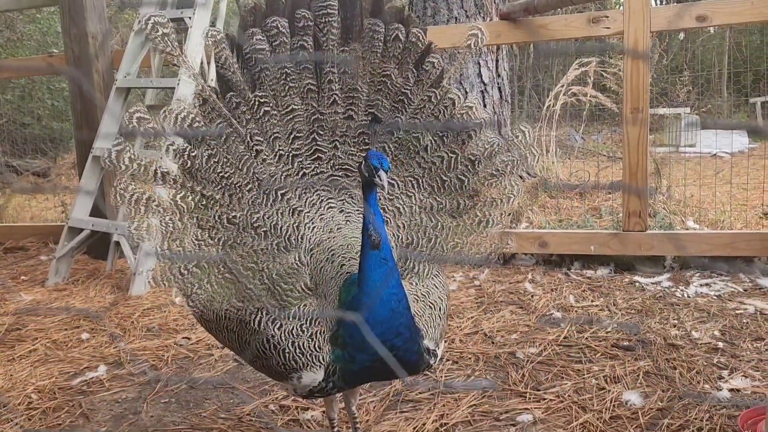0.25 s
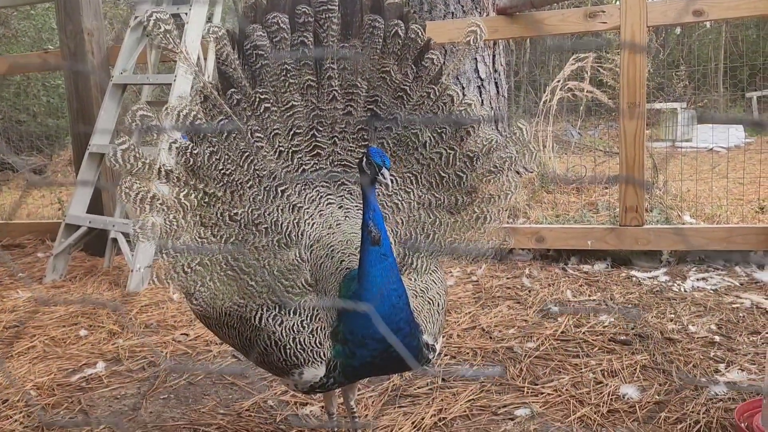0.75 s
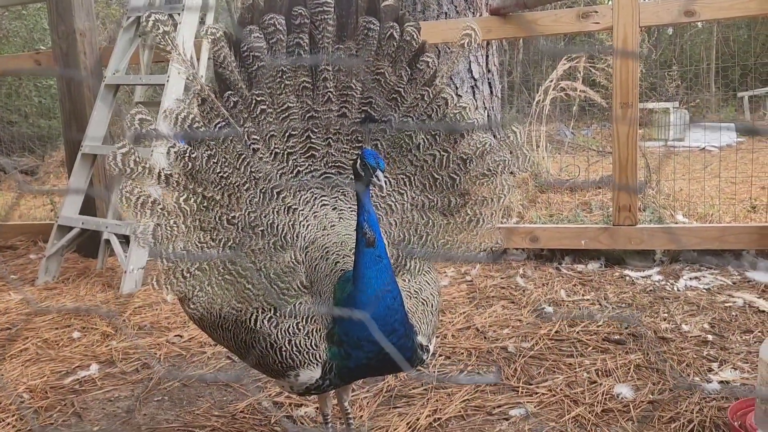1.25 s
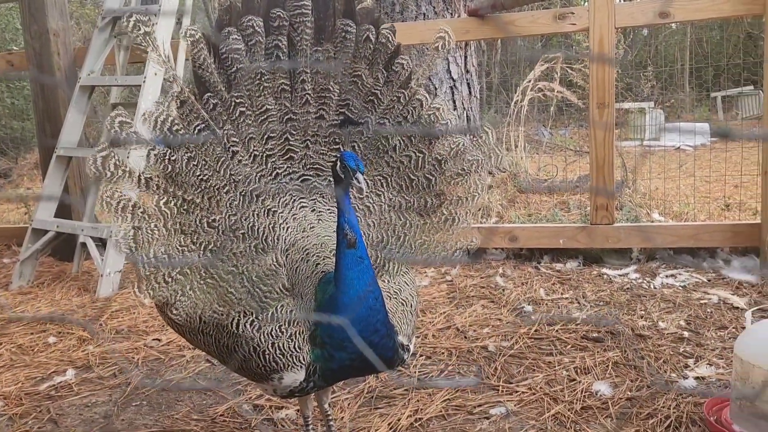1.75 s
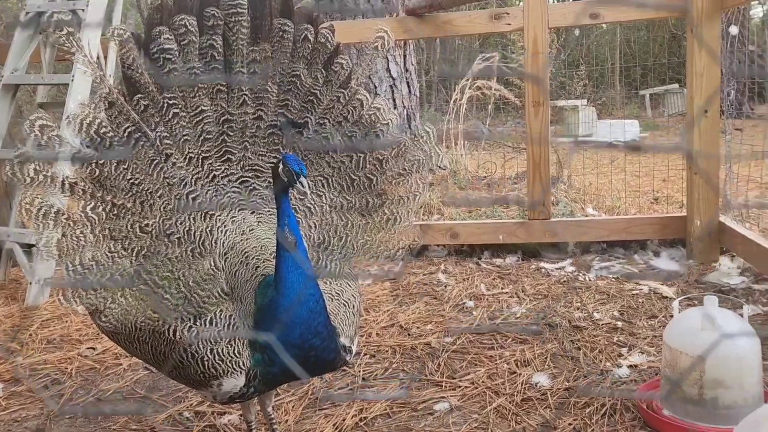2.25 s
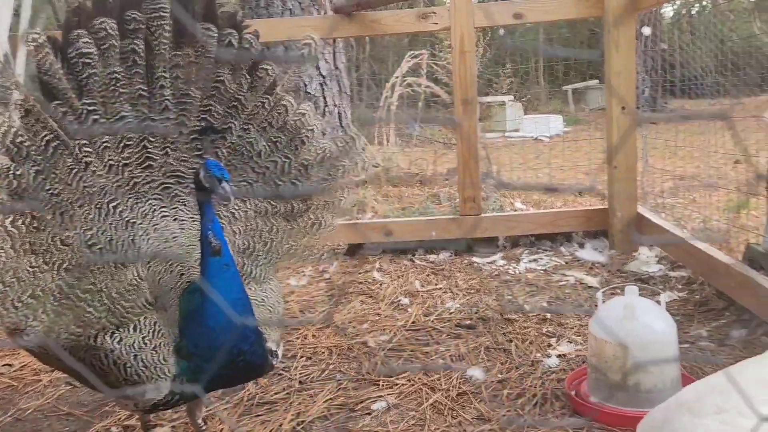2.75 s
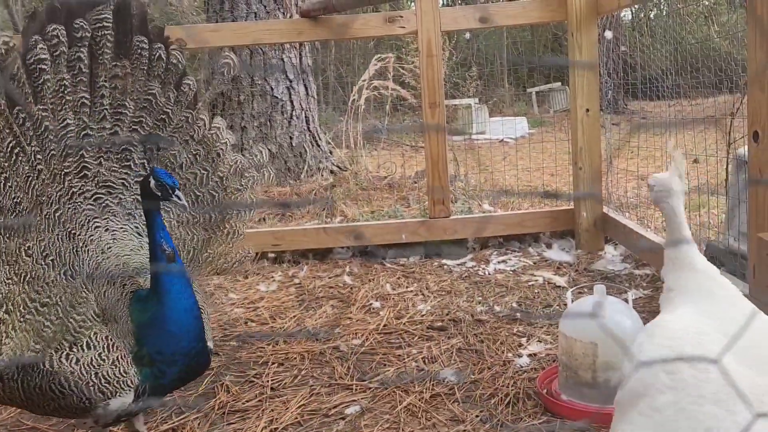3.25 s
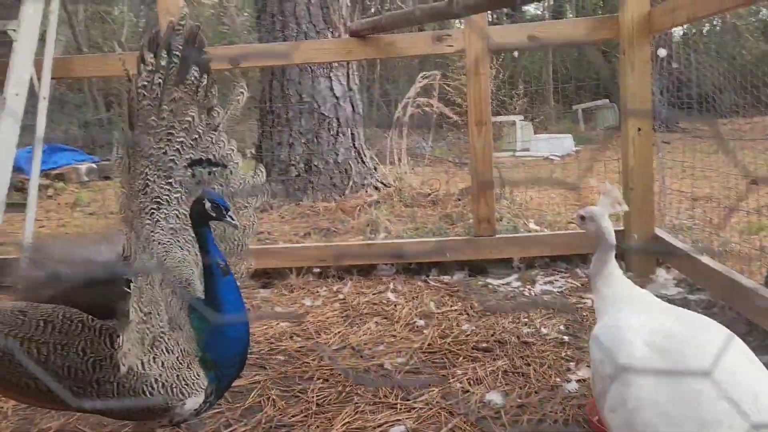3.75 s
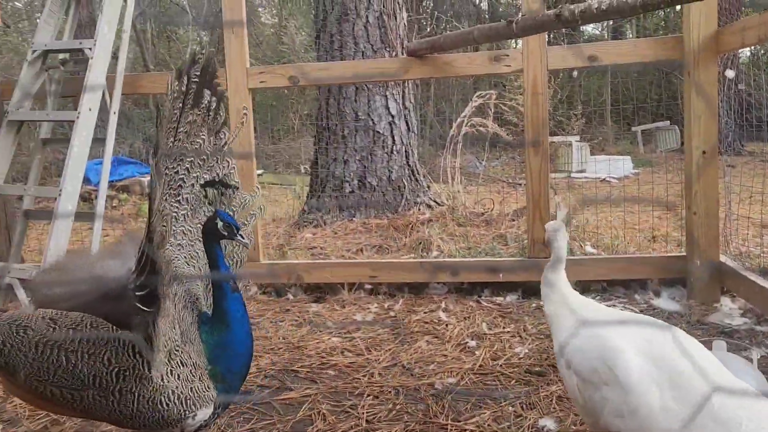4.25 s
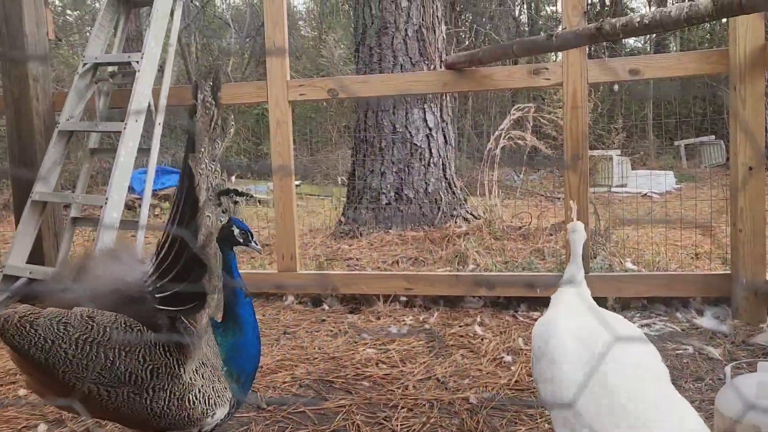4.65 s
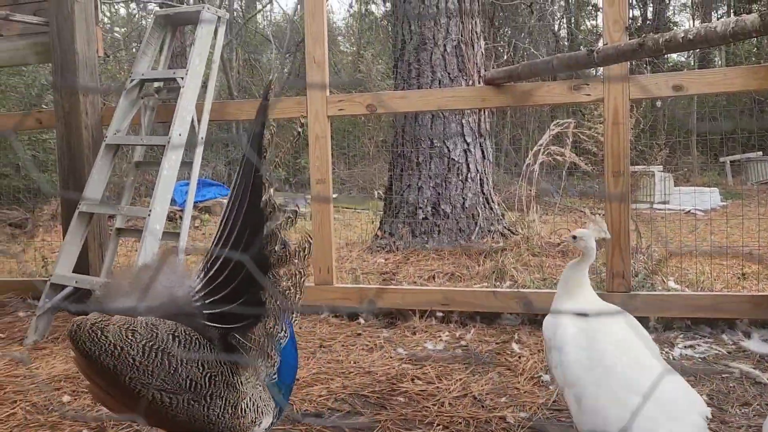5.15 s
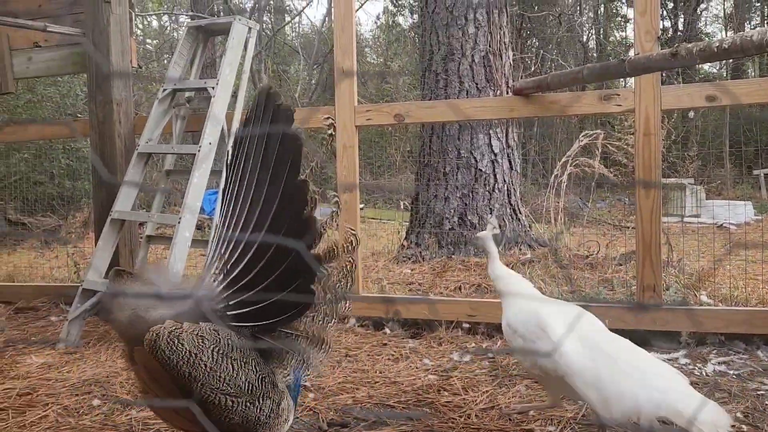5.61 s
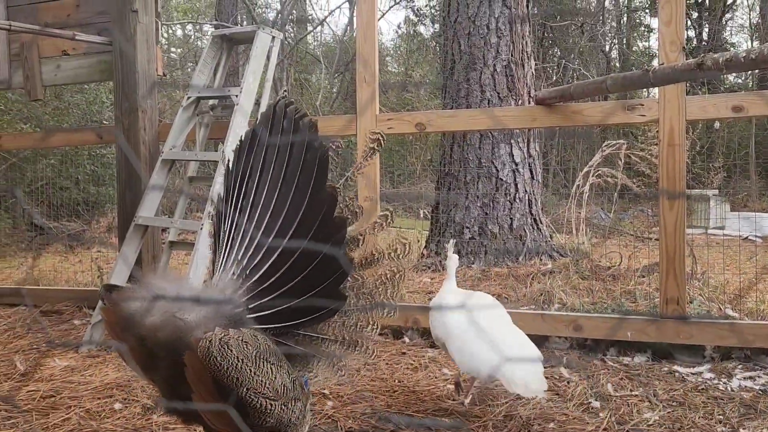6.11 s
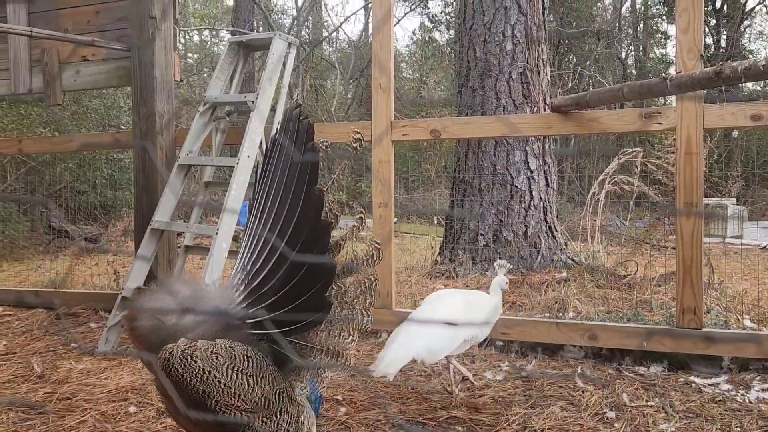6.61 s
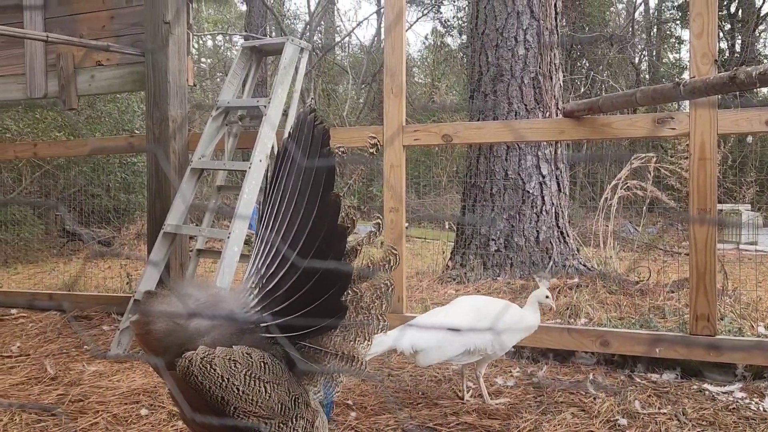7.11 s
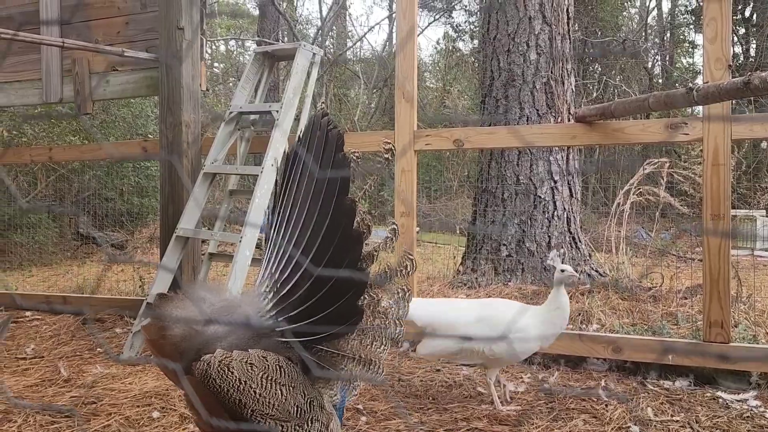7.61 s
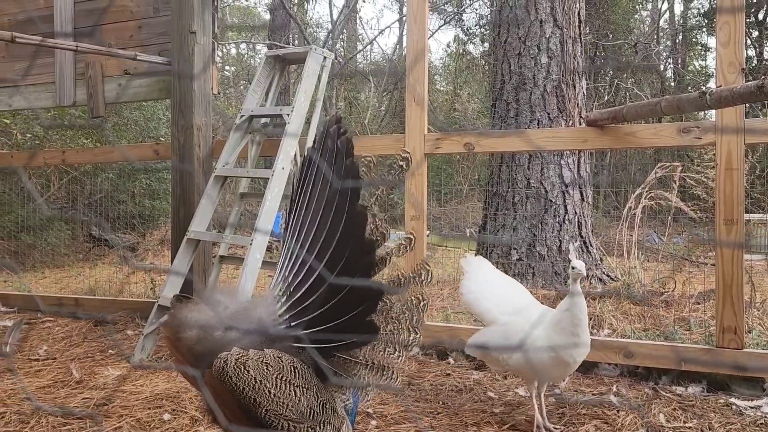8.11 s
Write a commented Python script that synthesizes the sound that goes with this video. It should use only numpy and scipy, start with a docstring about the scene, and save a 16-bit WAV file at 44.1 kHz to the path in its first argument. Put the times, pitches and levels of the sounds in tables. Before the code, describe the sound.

Hens cluck and give one long hoarse call as a peacock rustles his feathers, with chicks peeping and low wind rumble.

```python
"""A wire pen outdoors, the stereo microphone by the fence. A peacock shivers his raised train, feather
brushing feather, while hens close by cluck, whine and give one long hoarse call from pulsing throats.
Chicks peep further in, dry pine straw snaps underfoot and wood knocks dully. Off in the trees a songbird
whistles and a far rooster crows; wind rumbles on the microphone over a distant idling engine."""
import sys
import numpy as np
from scipy import signal
from scipy.fft import rfft, irfft
from scipy.io import wavfile
from scipy.ndimage import uniform_filter1d

SR = 44100
rng = np.random.default_rng(int(sys.argv[2]) if len(sys.argv) > 2 else 0)


def wav_record(signal):
    """Record a signal, one row per channel, as 16-bit PCM in the file named by sys.argv[1]."""
    frames = np.transpose(np.atleast_2d(signal))
    bounded = np.clip(frames, -1, 1)
    # unit amplitude maps onto the largest positive 16-bit level
    quanta = np.round(bounded * 32767).astype(np.int16)
    wavfile.write(sys.argv[1], SR, quanta)


N = 369116
T = np.arange(N) / SR
BIN_HZ = np.maximum(np.arange(N // 2 + 1) * SR / N, 1)


def from_db(db):
    """Decibels to gain."""
    return 10 ** (np.asarray(db) / 20)


def unit_rms(x):
    """Scale to unit power."""
    return x / np.sqrt(np.mean(x ** 2) + 1e-20)


def in_time(points):
    """Read a curve of (seconds, value) points at every sample."""
    return np.interp(T, *np.transpose(points))


def at_hz(points, hz):
    """Read a spectrum on a log-frequency axis."""
    point_hz, values = np.transpose(points)
    return np.interp(np.log(hz), np.log(point_hz), values)


def ramp(start, length):
    """Rise from 0 to 1 over the given seconds."""
    return np.clip((T - start) / length, 0, 1)


def arch(length):
    """A swell that rises and falls over the given seconds."""
    return np.sin(np.linspace(0, np.pi, max(int(length * SR), 64)))


def drift(rate_hz):
    """A smooth random wander with spread 1."""
    hop = 40
    pole = np.exp(-2 * np.pi * rate_hz * hop / SR)
    slow = signal.lfilter([1], [1, -2 * pole, pole ** 2], rng.standard_normal(N // hop + 2002))[2000:]
    return np.interp(np.arange(N) / hop, np.arange(len(slow)), unit_rms(slow))


def band(x, low_hz, high_hz):
    """Gentle band-pass."""
    sos = signal.butter(2, [low_hz, min(high_hz, .45 * SR)], "band", fs=SR, output="sos")
    return signal.sosfilt(sos, x + 1e-18)


def resonate(x, modes):
    """Parallel resonances with alternating signs."""
    out = 0
    for k, (hz, width, db) in enumerate(modes):
        r = np.exp(-np.pi * width / SR)
        feed = np.array([1, 0, -1]) * (1 - r * r) / 2
        feedback = [1, -2 * r * np.cos(2 * np.pi * hz / SR), r * r]
        out = out + (-1) ** k * from_db(db) * signal.lfilter(feed, feedback, x + 1e-18)
    return out


def add(track, start, sound):
    """Mix a sound in at its start time in seconds."""
    at = round(start * SR)
    part = sound[max(-at, 0):max(N - at, 0)]
    track[max(at, 0):max(at, 0) + len(part)] += part


def notes(rows, throat, bow_oct, jitter, jitter_hz, flutter, harmonics):
    """Bird calls: harmonic tones on bowed glides; the membrane wavers in pitch and strength."""
    out, waver, shake = np.zeros(N), drift(jitter_hz), drift(jitter_hz)
    k = np.arange(1, harmonics + 1)[:, None]
    for start, length, middle_hz, fall_oct, db, tilt_db in rows:
        swell = arch(length)
        along = np.linspace(-1, 1, len(swell))
        here = (np.arange(len(swell)) + int(abs(start) * SR)) % N
        hz = middle_hz * 2 ** (-fall_oct * along / 2 - bow_oct * along ** 2) * (1 + jitter * waver[here])
        gains = from_db(at_hz(throat, k * hz) + tilt_db * np.log2(k)) * (k * hz < SR / 2)
        tone = np.sum(gains * np.sin(2 * np.pi * k * np.cumsum(hz) / SR), axis=0)
        add(out, start, from_db(db) * unit_rms(tone) * swell * (1 + flutter * shake[here]))
    return out


# Diffuse sound at the microphone's two ports. Each row: frequency in Hz, left-right correlation.
PORT_LIKENESS = [(40, 1), (250, 0.82), (600, 0.43), (1200, 0.13), (2500, 0), (15000, 0)]
def diffuse(pair, spectrum):
    """Two unrelated noises become a stereo field with this spectrum, alike in the bass."""
    skirt = np.minimum(BIN_HZ / spectrum[0][0], 1) ** 2
    mid, side = rfft(pair) * from_db(at_hz(spectrum, BIN_HZ)) * skirt
    alike = at_hz(PORT_LIKENESS, BIN_HZ)
    return unit_rms(irfft(np.sqrt(1 + alike) * mid + np.sqrt(1 - alike) * side * [[1], [-1]], N))


# The hush all round the pen. Each row: frequency in Hz, relative density in dB.
AIR_SPECTRUM = [(200, -8), (400, -6.5), (600, -10), (1150, -14), (2120, -19), (2600, -25.5), (4500, -23),
                (6600, -31.5), (7700, -19.5), (10200, -42.5), (13000, -37), (15800, -49)]
def still_air(level_db=-67):
    """Still air in the woods, a faint even hiss."""
    return from_db(level_db) * diffuse(rng.standard_normal((2, N)), AIR_SPECTRUM)


# Rumble right on the microphone. Each row: frequency in Hz, relative density in dB.
WIND_SPECTRUM = [(15, -13), (28, 2.5), (45, 4.5), (70, 4), (110, 0), (160, -6.5), (230, -18.5),
                 (400, -58.5)]
# The wind's strength, dropping late on. Each row: time in seconds, level in dB.
GUSTS = [(0, -52), (5.6, -50), (6.2, -56), (8.37, -54)]
def wind():
    """Wind buffets the ports in an unsteady rumble."""
    return from_db(in_time(GUSTS) + drift(5.7)) * diffuse(rng.standard_normal((2, N)), WIND_SPECTRUM)


def engine(turn_hz=22.37, peak_s=7.64, peak_db=-44.5, idle_db=-62.5):
    """Two low orders of a far engine hum, swelling once out of a faint idle."""
    below_peak_db = np.maximum(6.5 * (peak_s - T), 17 * (T - peak_s))   # rise and fall in dB per second
    turns = np.cumsum(turn_hz * (1 + .013 * drift(2.3))) / SR
    hum = sum(from_db(db + drift(2.4)) * np.sin(2 * np.pi * order * turns)
              for order, db in [(2, -.5), (3, -4.5)])
    return from_db(np.maximum(peak_db - below_peak_db, idle_db)) * unit_rms(hum)


# Hens clucking near the fence. Each row: start in seconds, pitch in Hz, level in dB,
# beak opening in dB, resonance of the throat's hollow in Hz.
CLUCKS = [(-.012, 380, -50, 0, 400), (.084, 384.4, -50.5, 5, 517), (.147, 273, -46.5, 1.5, 340),
          (.338, 315.5, -39.5, 2, 330), (.476, 321, -43, 0, 330), (.618, 299.6, -48.5, 1, 320),
          (.82, 230, -49.5, -20, 340), (.906, 239.7, -38.5, -17, 360), (1.011, 235.5, -41, -17, 390),
          (1.139, 250, -42, -12, 480), (1.255, 184.7, -44.5, -15, 385), (1.377, 205.5, -47.5, -19, 333),
          (1.508, 190.5, -46.5, -2, 385), (1.638, 231, -46, -1, 402), (1.77, 265, -47, -3, 279.8),
          (1.897, 261, -47, 2, 292), (2.216, 256.3, -46, -0.5, 422), (2.35, 208.3, -50, -3, 375),
          (2.502, 250, -49, -3, 330), (2.933, 277, -42, 1, 285), (3.256, 298, -51.5, -1, 350),
          (3.316, 261, -51.5, 4, 350)]
# Resonances of the throat, then of the beak. Each row: centre in Hz, width in Hz, gain in dB.
CLUCK_THROAT = [(210, 70, 0), (502, 120, -8), (695, 50, -5.5)]
CLUCK_BEAK = [(795, 79, -2), (1293, 120, -9.5), (1610, 154, -10.5), (2250, 140, -17.5), (4030, 800, -12.5)]
def clucks(length_s=.06, jitter=.1, weakening=.35, breath=.09, sink=.12, lift=.19):
    """Strong and weak pulses alternate and ring the throat; an open beak adds the upper resonances."""
    out, waver, n = np.zeros(N), drift(50), int(length_s * SR)
    swell = np.abs(np.sin(np.pi * np.linspace(0, 1, n) ** .75)) ** 1.7   # opens faster than it closes
    along = np.linspace(-1, 1, n)
    tightening = np.cumsum(np.exp(lift * along))   # the throat tightens, so its resonances rise
    for start, hz, db, open_db, hollow_hz in CLUCKS:
        cycles = np.cumsum(hz * np.exp(jitter * waver[int(abs(start) * SR):][:n] - sink * along)) / SR
        pulses = np.diff(np.floor(cycles), prepend=0) * (1 - weakening * (np.floor(cycles) % 2))
        source = pulses + breath * rng.standard_normal(n) * (1 - cycles % 1) ** 2
        throat = band(resonate(source, CLUCK_THROAT + [(hollow_hz, 95, 5)]), 130, 624)
        beak = band(resonate(source, CLUCK_BEAK), 770, 2460)
        voice = np.interp(tightening, np.arange(n), throat + from_db(open_db) * beak)
        add(out, start, from_db(db) * swell * unit_rms(voice))
    return out


# The same hens whining. Each row: start and length in seconds, pitch in Hz, fall in octaves, level in dB.
WHINES = [(0.03, 0.29, 535, 0.06, -58), (.37, .13, 550, -.06, -58), (0.12, 0.33, 397.3, 0.024, -57),
          (0.43, 0.34, 392, 0.14, -54), (.72, .25, 355, .1, -60), (0.499, 0.14, 598.5, -0.16, -54.5),
          (0.56, 0.095, 662, 0.31, -50.5), (1.585, 0.059, 368, 0.18, -50), (1.674, .05, 378, .3, -48),
          (1.718, 0.16, 420, -0.084, -56), (1.851, 0.031, 432, 0.021, -54),
          (1.92, 0.25, 417.5, 0.14, -51.5), (4.46, .4, 425, .25, -49.5), (4.76, .19, 391.6, 0.16, -53)]
# A hen's throat in whines and alarm clucks. Each row: frequency in Hz, gain in dB.
HEN_THROAT = [(350, 18.5), (560, -2.5), (830, 12.5), (1050, -9), (1350, -3), (1750, -14.5), (2200, -21),
              (2700, -47), (3600, -34), (5500, -42.5), (8000, -51)]
def whines(tilt_db=.7):
    """Soft tones, short or drawn out, coloured by the throat; the level is rough and wavering."""
    rows = [(*row, tilt_db) for row in WHINES]
    voice = notes(rows, HEN_THROAT, bow_oct=.0394, jitter=.028, jitter_hz=30, flutter=.37, harmonics=7)
    return voice * (1 + .24 * drift(110)) * from_db(1.6 * drift(12))


# A hen further left. Each row: start and length in seconds, pitch in Hz, level in dB,
# brightness in dB per octave.
CRIES = [(0.186, 0.042, 602, -53.5, -11), (1.51, 0.047, 584, -48.5, -11), (3.059, 0.062, 573, -56, 7),
         (3.187, 0.047, 694, -45, 10), (3.402, 0.033, 480, -46, -2), (3.495, 0.073, 523, -43.5, -9),
         (3.64, 0.122, 478, -44, -7), (4.415, .09, 545, -43, -11), (3.692, .035, 695, -35, 13.5),
         (3.877, .04, 640, -34.5, 15)]
# Her throat. Each row: frequency in Hz, gain in dB.
CRY_THROAT = [(550, -18), (1000, 5), (1400, 1.5), (1950, -3), (2700, -17.5), (4000, -32)]
def cries(rise_oct=.09):
    """Slightly rising cries, made nasal by a throat that favours the overtones."""
    rows = [(start, length, hz, -rise_oct, db, tilt_db) for start, length, hz, db, tilt_db in CRIES]
    return notes(rows, CRY_THROAT, bow_oct=.05, jitter=.015, jitter_hz=120, flutter=.25, harmonics=6)


# Chicks further into the pen. Each row: start and length in seconds, middle pitch in Hz,
# fall in octaves, level in dB.
PEEPS = [(3.135, .045, 3700, -.4, -56), (3.171, 0.056, 3860, 0.55, -49), (4.565, 0.055, 3320, 0.44, -50.5),
         (5.506, .06, 3370, 0.36, -48.5), (5.667, 0.069, 3396, 0.48, -47), (6.82, .026, 3150, -0.7, -59),
         (6.837, .032, 4150, .1, -52.5), (6.858, .035, 3200, .45, -58), (6.898, 0.083, 3280, 0.7, -53.5),
         (7.027, .088, 3570, .5, -49), (7.19, 0.094, 3540, 0.55, -48), (7.478, 0.1, 3450, .5, -55),
         (7.658, .1, 3430, 0.58, -53)]
# A squealing throat, then a flat one for pure whistles. Each row: frequency in Hz, gain in dB.
SQUEAL_THROAT = [(2500, -21), (4400, 2.5), (5400, -3.5), (7400, -24), (10000, -18), (12500, -38),
                 (15000, -46)]
FLAT_THROAT = [(2000, 0), (12000, 0)]
def chicks(octave_db=-19.5, squeal_at_s=.521):
    """One shrill squeal breaks down from its loud second harmonic; nearly pure peeps follow."""
    squeal_row = (squeal_at_s, .112, 2484, .131, -46, 0)
    break_row = (.598, .038, 3800, .131, -51)
    rows = [(*row, octave_db) for row in PEEPS + [break_row]]
    peeps = notes(rows, FLAT_THROAT, bow_oct=.07, jitter=.036, jitter_hz=520, flutter=.46, harmonics=2)
    squeal = notes([squeal_row], SQUEAL_THROAT,
                   bow_oct=.031, jitter=.042, jitter_hz=600, flutter=.36, harmonics=6)
    return peeps + ramp(squeal_at_s, .016) * squeal


def crackle(rows, attack_s=.0004, decay_s=.003, band_ratio=1.98):
    """Each touch sets off a burst of tiny cracks that builds quickly and dies away."""
    out, t = np.zeros(N), np.arange(SR // 4) / SR
    burst = (1 - np.exp(-t / attack_s)) * np.exp(-t / decay_s)
    for start, db, hz in rows:
        cracks = band(rng.laplace(size=len(t)), hz / band_ratio, hz * band_ratio)
        add(out, start, from_db(db) * burst * unit_rms(cracks))
    return out


# Snaps, then scratches, on the pen floor. Each row: start in seconds, level in dB, centre in Hz.
SNAPS = [(.856, -55, 6500), (2.129, -47.5, 9500), (2.161, -50.5, 8500), (2.269, -40, 4200),
         (2.288, -51, 3600), (2.328, -52, 8000), (7.531, -55, 4800), (7.744, -43, 9000)]
SCRATCHES = [(2.286, -59, 2860), (2.318, -52.5, 2200), (2.672, -51, 1980), (2.876, -57.5, 9000),
             (2.928, -53, 3200), (3.328, -42.5, 4500), (6.864, -65, 9000)]
def straw():
    """Dry pine straw snaps underfoot; scratching feet draw longer crackles from it."""
    return crackle(SNAPS, band_ratio=1.9) + crackle(SCRATCHES, attack_s=.008, decay_s=.033)


# The peacock's bouts of shivering. Each row: start, build-up and stop in seconds, relative level in dB.
SHIVERS = [(1.17, 0.24, 1.75, -69.5), (2.48, 0.2, 2.78, -67), (2.72, 1.0, 5.965, -54.5),
           (6.45, 0.2, 6.72, -74), (7.64, 0.5, 8.32, -56)]
# The rustle of his quills. Each row: frequency in Hz, relative density in dB.
QUILL_SPECTRUM = [(290, -46), (500, -10), (697, -5), (1140, -5), (1660, -0.5), (1810, -4.5), (2150, 2),
                  (2450, -4.5), (5420, -3.5), (5920, -6.5), (8860, -7.5), (10900, -14), (12900, -5.5),
                  (15800, -14.5)]
def shivering_train(shake_hz=25.65, grains_per_s=12000, settle_db_per_s=75, rest_db=-89, gain_db=8.5):
    """Feathers brush twice a shake, denser and brighter the harder he shivers; the fan wafts the air."""
    bouts = [from_db(db - settle_db_per_s * np.maximum(T - stop, 0)) * ramp(start, build) ** 1.18
             for start, build, stop, db in SHIVERS]
    level = np.sqrt(from_db(rest_db) ** 2 + np.sum(np.square(bouts), axis=0))
    vigour = level / level.max()
    gentleness = 1 - vigour
    shakes = np.cumsum(shake_hz * (1 + .026 * drift(5.7))) / SR
    strokes = 1 + .09 * np.sin(4 * np.pi * shakes)
    density = np.clip(grains_per_s / SR * vigour ** .33, .01, 1)
    grains = rng.standard_normal((2, N)) * (rng.random((2, N)) < density) / np.sqrt(density)
    patches = from_db(2.5 * gentleness * drift(250))   # gentle shivers break up into separate scratches
    patches /= np.sqrt(uniform_filter1d(patches ** 2, SR // 10))
    rustle = diffuse(grains * patches, QUILL_SPECTRUM)
    sheen = signal.sosfiltfilt(signal.butter(2, 9500, "high", fs=SR, output="sos"), rustle)
    rustle -= .42 * gentleness * sheen
    waft_level = from_db(-67 + 3 * drift(12)) * vigour ** .63
    waft = waft_level * unit_rms(band(rng.standard_normal(N), 140, 340))
    flicker_db = (.66 + gentleness) * drift(20)
    return waft + from_db(gain_db + flicker_db) * level * strokes * rustle


# His train sweeping through the air and over the straw as he turns.
# Each row: start and length in seconds, level in dB, centre in Hz.
SWEEPS = [(1.27, .22, -64, 2060), (2.5, 0.32, -64, 2000), (3.05, .14, -58.5, 4500), (3.25, .1, -55, 7500),
          (3.58, 0.35, -49.3, 4600), (3.6, .42, -57, 270), (5.11, .28, -56, 260),
          (5.141, 0.21, -56.5, 2300), (7.77, .22, -65, 1500)]
def train_sweeps(band_ratio=1.42):
    """Long feathers slide past each other in a grainy swish."""
    out = np.zeros(N)
    for start, length, db, hz in SWEEPS:
        swell = arch(length)
        barbs = unit_rms(band(rng.laplace(size=SR), hz / band_ratio, hz * band_ratio))
        add(out, start, from_db(db) * swell * barbs[:len(swell)])
    return out * from_db(1.6 * drift(30))


# A songbird off in the trees. Each row: start and length in seconds, pitch in Hz, level in dB.
WHISTLES = [(1.574, .07, 3560, -58), (1.64, 0.2, 3230, -68), (6.525, 0.06, 3317, -61),
            (6.596, 0.19, 3120, -64), (7.565, .13, 3580, -66), (7.77, 0.12, 3530, -64)]
def songbird(fall_oct=.1, octave_db=-35):
    """Thin, gently falling whistles that waver in level."""
    rows = [(start, length, hz, fall_oct, db, octave_db) for start, length, hz, db in WHISTLES]
    voice = notes(rows, FLAT_THROAT, bow_oct=.015, jitter=.013, jitter_hz=140, flutter=.4, harmonics=2)
    return voice * from_db(2.5 * drift(18))


# A startled hen close to the microphone. Each row: start and length in seconds, pitch in Hz,
# fall in octaves, level in dB, brightness in dB per octave.
ALARMS = [(2.038, 0.021, 555, -0.11, -26.1, -1.5), (2.047, 0.019, 688, -0.17, -34, 8),
          (2.129, 0.018, 665, -0.28, -34.3, 2.5), (2.145, .017, 589, 0.77, -33, -1.5),
          (2.202, 0.01, 600, -.05, -43, -8)]
def alarm_clucks():
    """Sharp, very short tones whose pitch arches through the throat's resonances."""
    return notes(ALARMS, HEN_THROAT, bow_oct=.14, jitter=.02, jitter_hz=200, flutter=.2, harmonics=12)


# Dull knocks in the pen, likely beaks or feet on wood. Each row: start in seconds, level in dB,
# pitch in Hz.
KNOCKS = [(2.269, -48, 700), (5.604, -41, 630), (6.108, -44, 320), (7.638, -54, 890), (7.803, -49, 950),
          (7.925, -47, 490)]
def knocks(attack_s=.0004, decay_s=.0045, crack_db=-2):
    """A rap sets one low resonance of the wood ringing for a moment, with a dry crack on top."""
    out, t = np.zeros(N), np.arange(SR // 10) / SR
    envelope = (1 - np.exp(-t / attack_s)) * np.exp(-t / decay_s)
    for start, db, hz in KNOCKS:
        add(out, start, from_db(db) * envelope * np.sin(2 * np.pi * hz * t))
    return out + from_db(crack_db) * crackle(KNOCKS)


# Soft steps among the hens. Each row: start in seconds, level in dB.
STEPS = [(2.59, -45), (2.71, -44), (3.615, -48.5), (3.755, -46.5), (3.925, -45.5), (4.09, -50),
         (5.208, -45.5), (5.28, -48)]
def footfalls(length_s=.054):
    """Feet press the litter with a dull thud."""
    out, swell = np.zeros(N), arch(length_s)
    thud = band(rng.standard_normal(N), 100, 315)
    for start, db in STEPS:
        add(out, start, from_db(db) * swell * unit_rms(thud[int(start * SR):][:len(swell)]))
    return out


# Where a near hen's long call catches and rings clear. Each row: start and length in seconds,
# level in dB, throb depth from 0 to 1.
CATCHES = [(3.757, 0.056, -38.5, .2), (3.875, 0.07, -36.3, 0.3), (3.995, 0.045, -43, .3),
           (4.059, 0.041, -35, 0.65), (4.117, 0.042, -34.5, 0.35), (4.146, .06, -39, .6),
           (4.195, 0.052, -29.8, 0.4), (4.266, 0.116, -31.5, 0.65), (4.383, 0.078, -32.5, 0.12)]
# Her throat's resonances before tension scales them. Each row: centre in Hz, width in Hz, gain in dB.
RASP_THROAT = [(510, 217, -5.5), (800, 110, -4), (965, 84, -2.5), (1070, 124, -6), (1410, 90, -12.5),
               (2000, 140, -17)]
# The throat tightens, then slackens at the end. Each row: time in seconds, scale of its resonances.
THROAT_TENSION = [(3.7, .96), (4.42, 1.05), (4.9, .8)]
def hoarse_call(start_s=3.43, hold_until_s=4.65, fade_s=.4, pitch_hz=551, sag_from_s=4.47, beat_hz=62):
    """A long wail: a slow second vibration chops the tone and puffs air through the throat as a rasp."""
    effort = from_db(-43) * ramp(start_s, .45) * (1 - ramp(hold_until_s, fade_s)) ** 1.8
    pitch = pitch_hz - 440 * np.clip(T - sag_from_s, 0, hold_until_s + fade_s - sag_from_s)
    tone_level = from_db(-13) * effort
    for start, length, db, _ in CATCHES:
        add(tone_level, start, from_db(db) * arch(length))
    depth = in_time([(start + length / 2, throb) for start, length, _, throb in CATCHES])
    beats = np.cumsum(beat_hz * (1 + .035 * drift(24.98))) / SR
    throb = 1 + depth * np.cos(2 * np.pi * beats)
    bend = depth * np.sin(2 * np.pi * beats)
    phase = 2 * np.pi * np.cumsum(pitch * (1 + .017 * drift(27.6))) / SR + bend
    tone = unit_rms((np.sin(phase) + .11 * np.sin(2 * phase)) * throb * from_db(1.6 * drift(23)))
    breath = .09 * rng.standard_normal(N) * (1 - beats % 1)
    puffs = np.diff(np.floor(beats), prepend=0) + breath
    rasp = unit_rms(band(resonate(puffs, RASP_THROAT), 235, 2130) * from_db(.93 * drift(27)))
    tension = in_time(THROAT_TENSION) * (1 + .025 * drift(14))
    rasp = np.interp(np.cumsum(tension), np.arange(N), rasp)   # the resonances follow the throat
    return tone_level * tone, effort * rasp


# A rooster's syllables, far off. Each row: start and length in seconds, pitch in Hz, fall in octaves,
# level in dB, brightness in dB per octave.
CROW = [(6.405, 0.092, 643, .3, -67, -1), (6.44, .15, 563, -0.11, -63.5, -4.5),
        (6.57, 0.233, 570.3, 0, -62.5, 8)]
# His throat. Each row: frequency in Hz, gain in dB.
CROW_THROAT = [(560, 2.5), (1150, 3.5), (1720, -4.5), (2300, -12.5), (2900, -29), (5000, -34)]
def rooster(throb_hz=48, throb_depth=.6):
    """Three syllables, coloured by the throat, run together in a throbbing crow."""
    voice = notes(CROW, CROW_THROAT, bow_oct=.0597, jitter=.021, jitter_hz=70.4, flutter=.43, harmonics=7)
    return voice * (1 + throb_depth * np.sin(2 * np.pi * throb_hz * T))


def in_pen(x, lag_ms, wet_db, t60_s):
    """Sound reaches the right port lag_ms after the left; ground, posts and trunks scatter a tail."""
    t = np.arange(SR // 2) / SR
    echoes = rng.standard_normal((2, len(t))) * (rng.random((2, len(t))) < .05)
    echoes *= (t > .003) * from_db(-60 * t / t60_s)
    tail = band(echoes[0], 90, 634) + band(echoes, 535, 7900)   # long waves reach both ports alike
    tail /= np.sqrt(np.sum(tail ** 2, axis=1, keepdims=True))
    direct = np.array([x, np.interp(T - lag_ms / 1000, T, x)])
    return direct + from_db(wet_db) * signal.fftconvolve(x[None], tail, axes=1)[:, :N]


def scene():
    """From the fence: hens near, the peacock in the pen, chicks further in, far birds in the trees."""
    tone, rasp = hoarse_call()
    to_right = from_db(5.5 * np.array([[-.5], [.5]]))   # the call's clear tone is louder on the right
    return (still_air() + wind() + engine() + shivering_train()
            + in_pen(clucks() + whines() + footfalls(), lag_ms=.14, wet_db=-11, t60_s=.28)
            + in_pen(cries(), lag_ms=.2, wet_db=-11, t60_s=.41)
            + in_pen(chicks(), lag_ms=-.07, wet_db=-10, t60_s=.17)
            + in_pen(straw() + knocks(), lag_ms=.052, wet_db=-10.5, t60_s=.061)
            + in_pen(train_sweeps(), lag_ms=.1, wet_db=-4, t60_s=.1)
            + in_pen(songbird() + rooster(), lag_ms=.072, wet_db=-3.5, t60_s=.16)
            + in_pen(alarm_clucks(), lag_ms=-.28, wet_db=-9, t60_s=.09)
            + in_pen(tone, lag_ms=.26, wet_db=-12, t60_s=.16) * to_right
            + in_pen(rasp, lag_ms=.13, wet_db=-4.5, t60_s=.19))


# The balance of the microphone's ports. Each row: frequency in Hz, left minus right in dB.
PORT_BALANCE = [(100, 0.3), (400, 2.1), (650, 3.5), (1200, 3), (2400, 0), (4400, 0), (8000, 4.5),
                (13000, 7.5)]
def record(dry, cutoff_hz=15900):
    """The microphone's left port is the brighter one; the top treble is cut steeply."""
    ports = from_db(at_hz(PORT_BALANCE, BIN_HZ) * np.array([[.5], [-.5]]))
    low_pass = 1 / np.sqrt(1 + (BIN_HZ / cutoff_hz) ** 300)
    return irfft(rfft(dry) * ports * low_pass, N)


dry = scene()
out = record(dry)
wav_record(out)
```